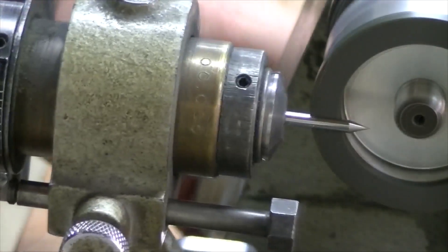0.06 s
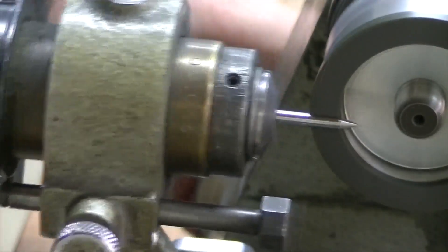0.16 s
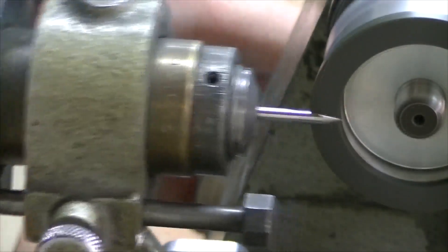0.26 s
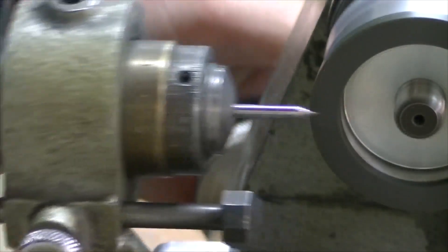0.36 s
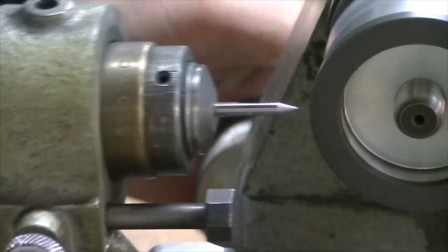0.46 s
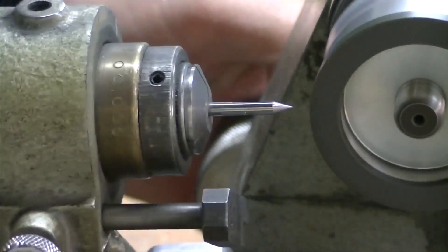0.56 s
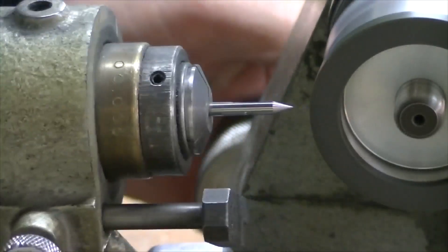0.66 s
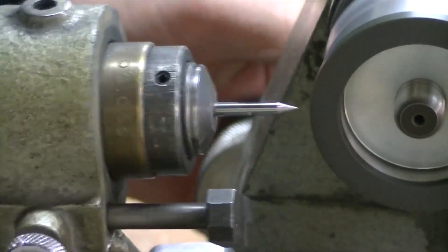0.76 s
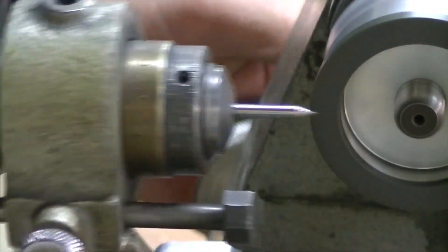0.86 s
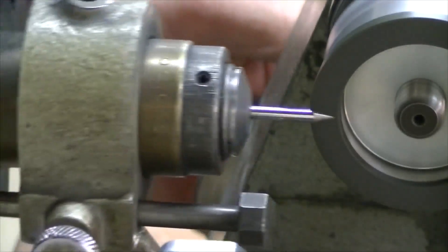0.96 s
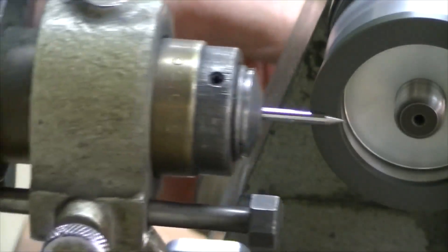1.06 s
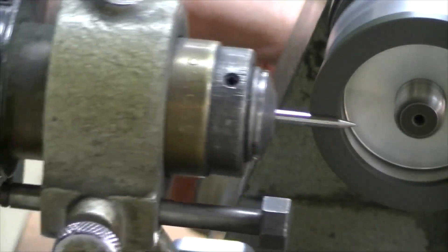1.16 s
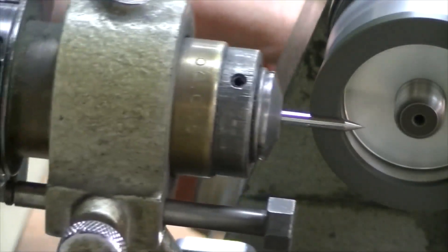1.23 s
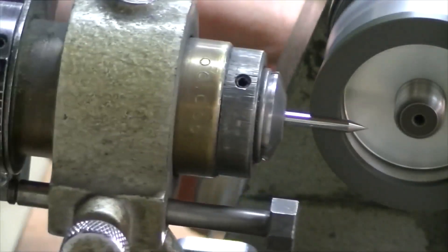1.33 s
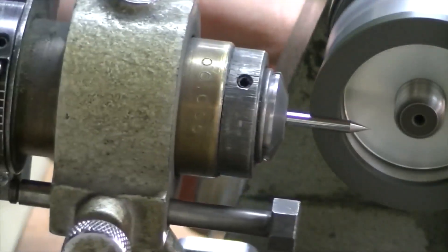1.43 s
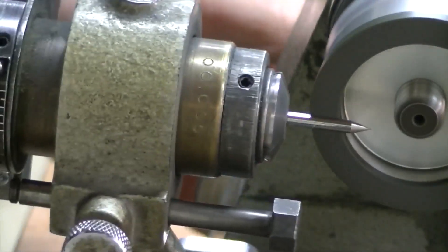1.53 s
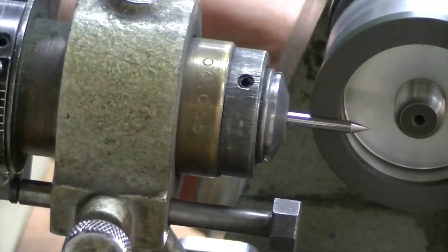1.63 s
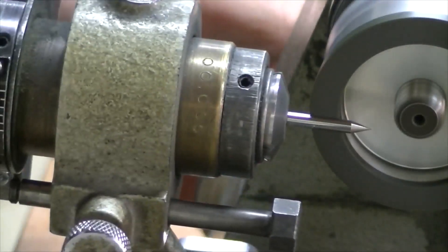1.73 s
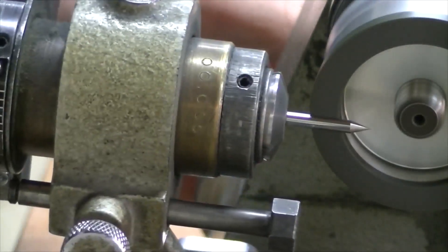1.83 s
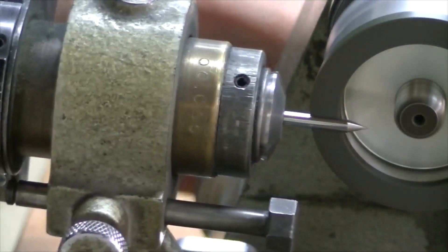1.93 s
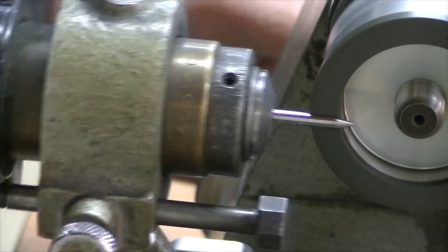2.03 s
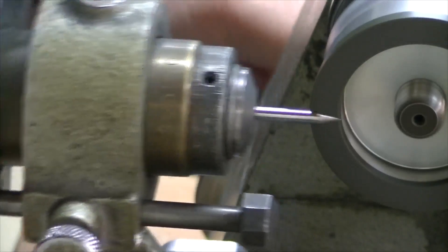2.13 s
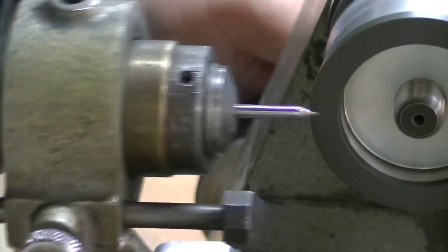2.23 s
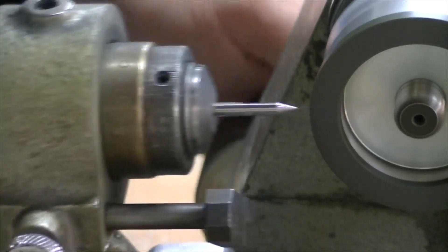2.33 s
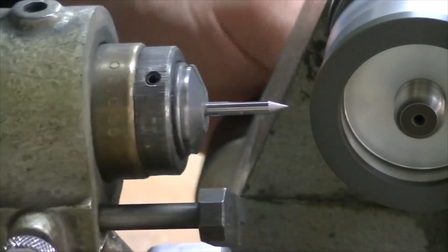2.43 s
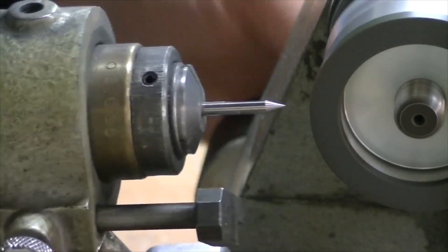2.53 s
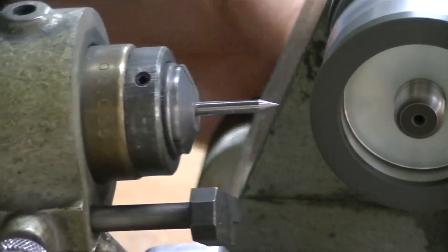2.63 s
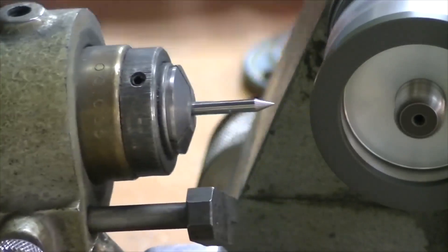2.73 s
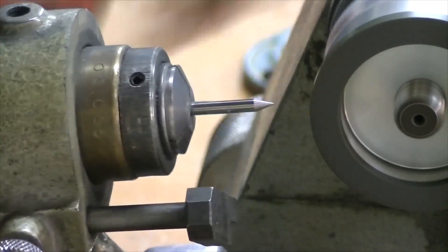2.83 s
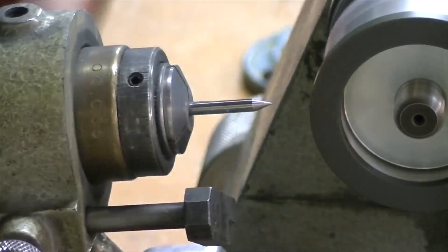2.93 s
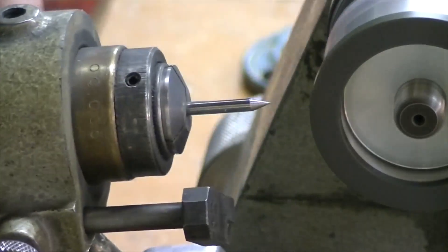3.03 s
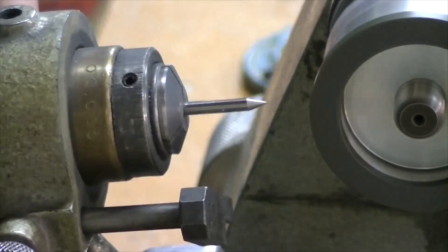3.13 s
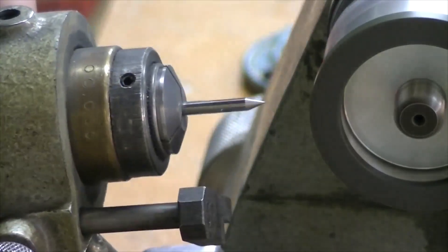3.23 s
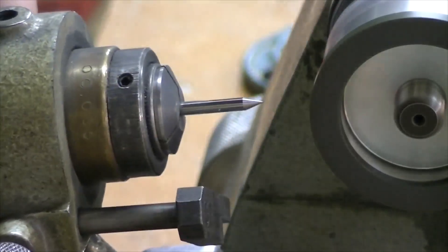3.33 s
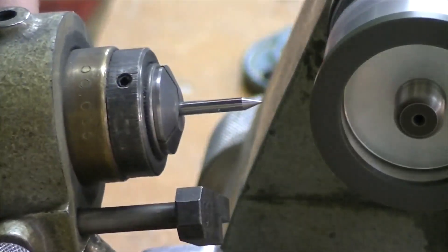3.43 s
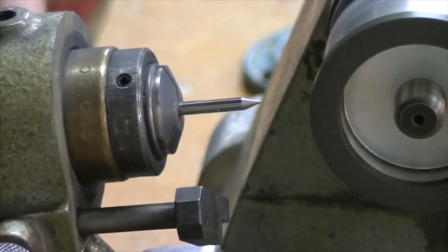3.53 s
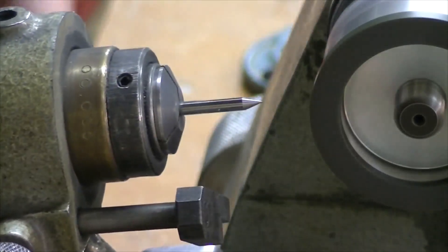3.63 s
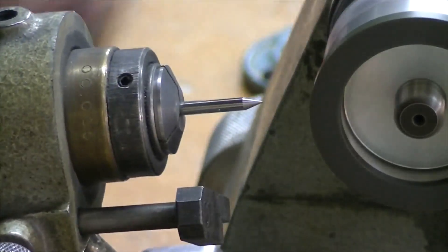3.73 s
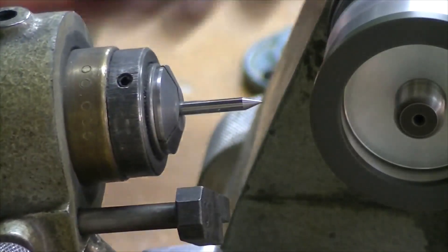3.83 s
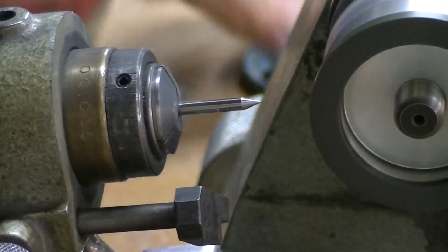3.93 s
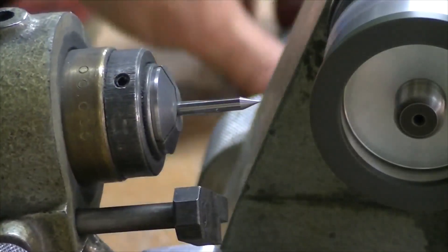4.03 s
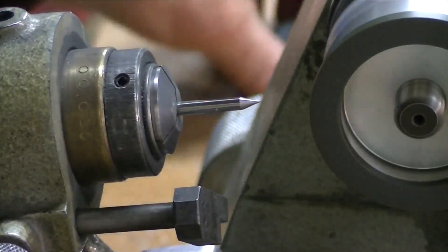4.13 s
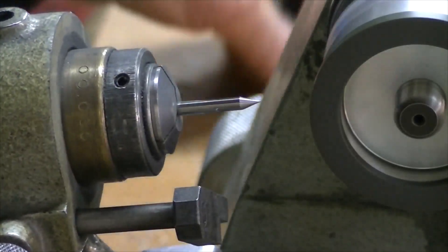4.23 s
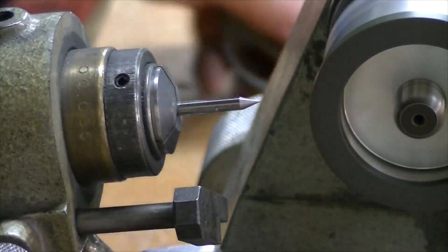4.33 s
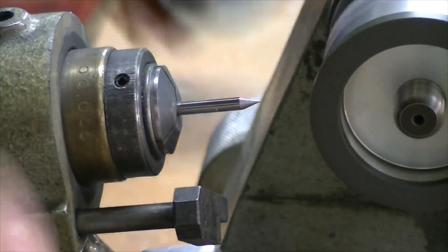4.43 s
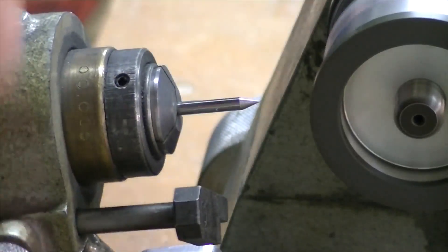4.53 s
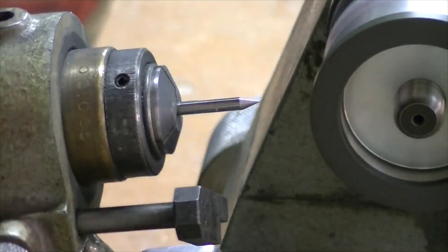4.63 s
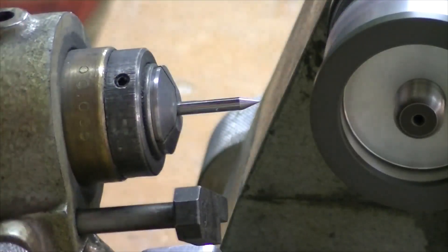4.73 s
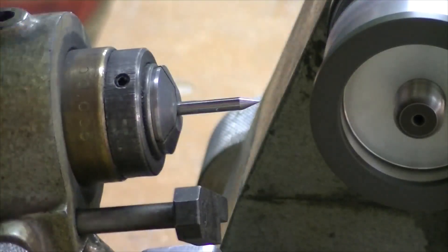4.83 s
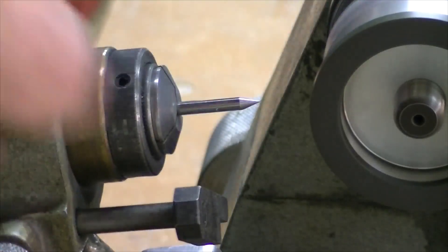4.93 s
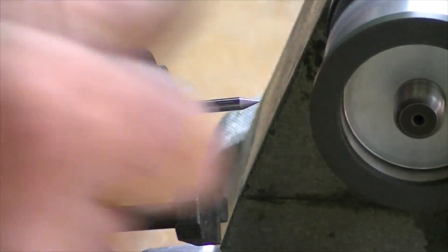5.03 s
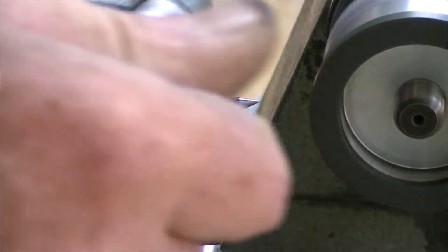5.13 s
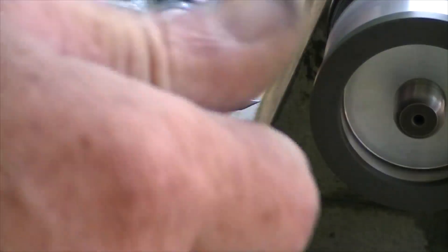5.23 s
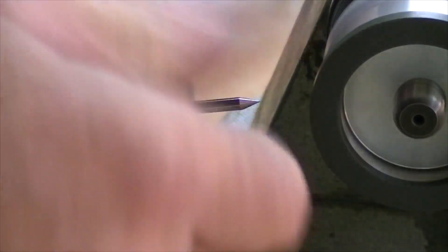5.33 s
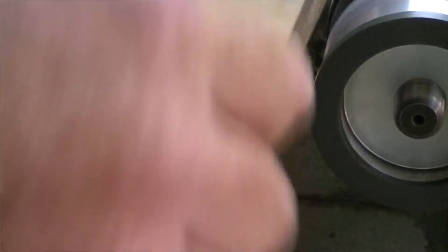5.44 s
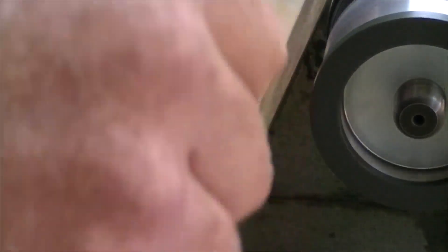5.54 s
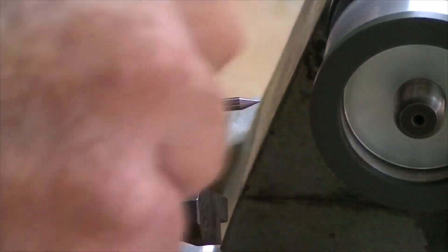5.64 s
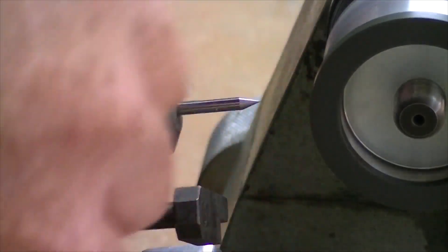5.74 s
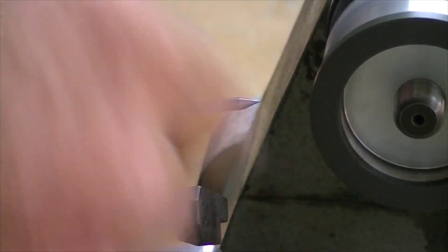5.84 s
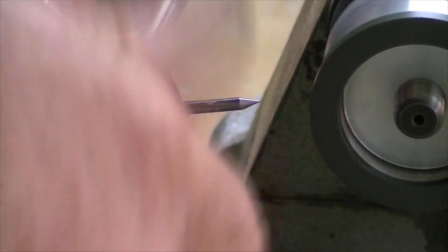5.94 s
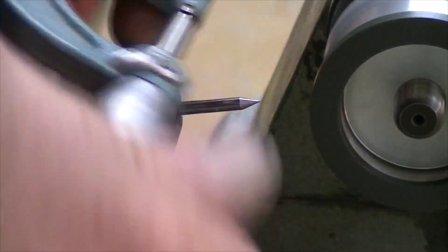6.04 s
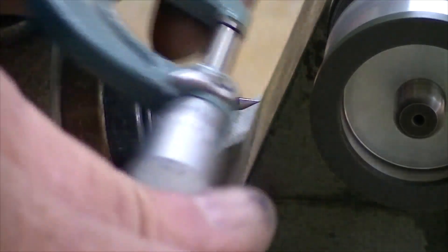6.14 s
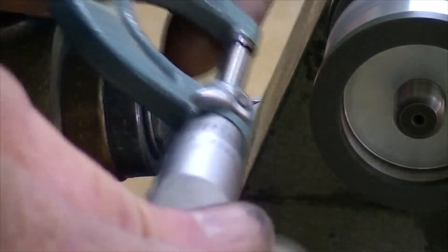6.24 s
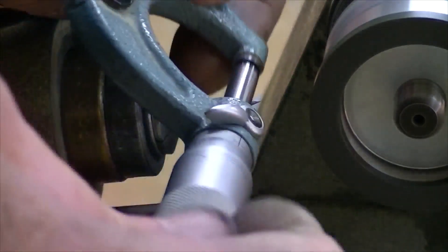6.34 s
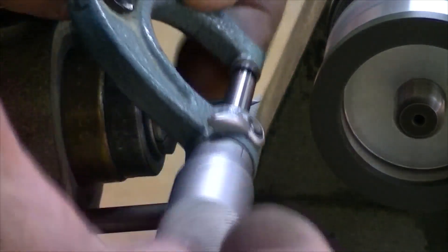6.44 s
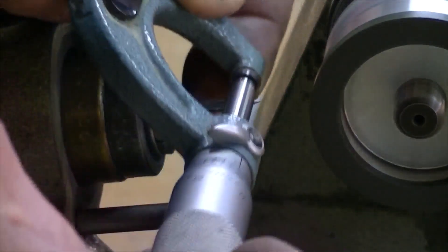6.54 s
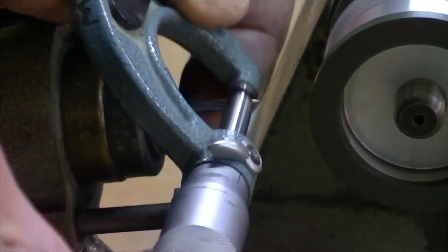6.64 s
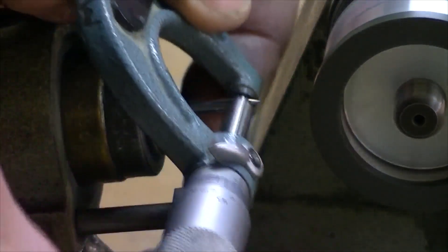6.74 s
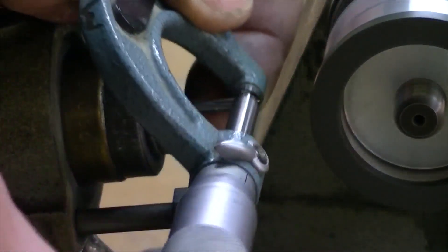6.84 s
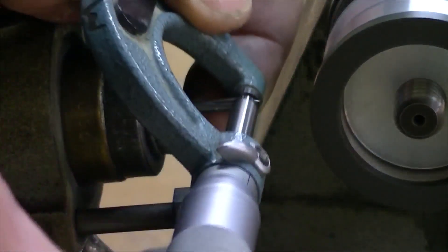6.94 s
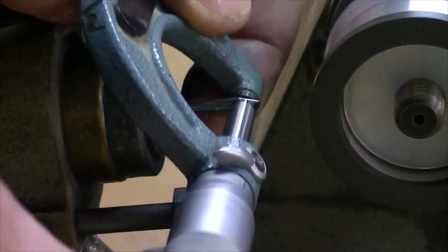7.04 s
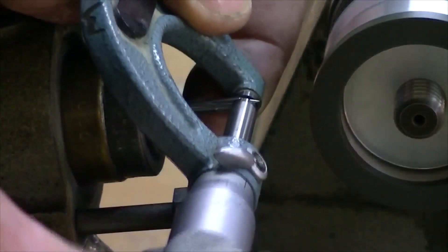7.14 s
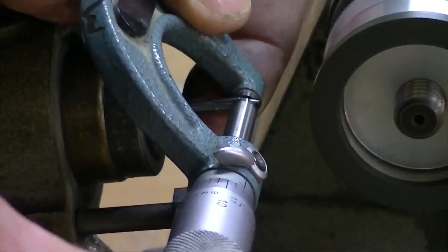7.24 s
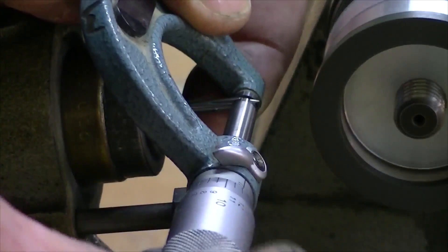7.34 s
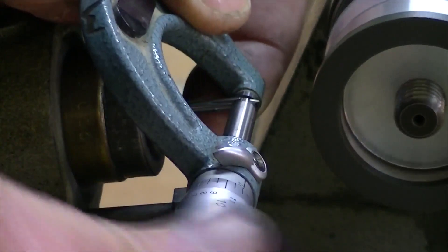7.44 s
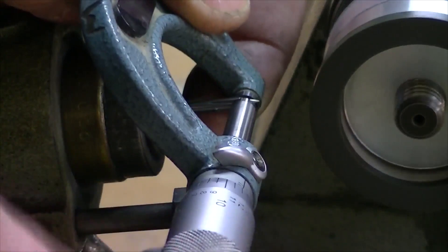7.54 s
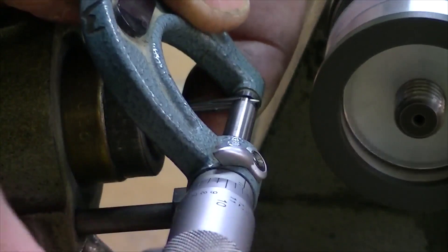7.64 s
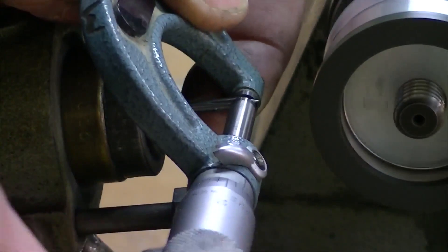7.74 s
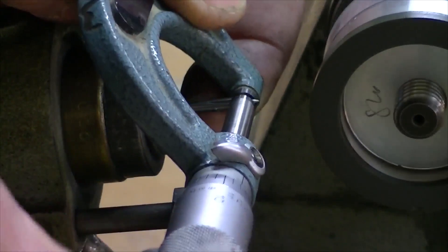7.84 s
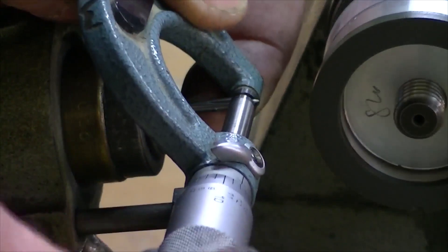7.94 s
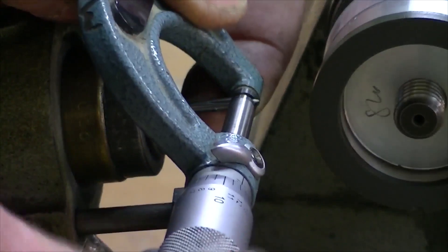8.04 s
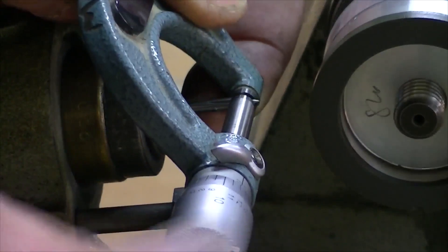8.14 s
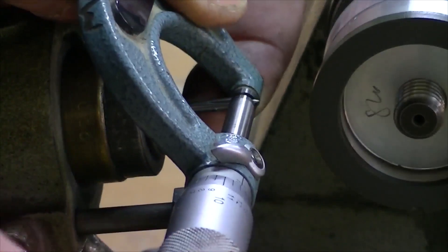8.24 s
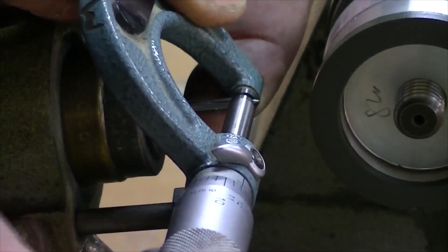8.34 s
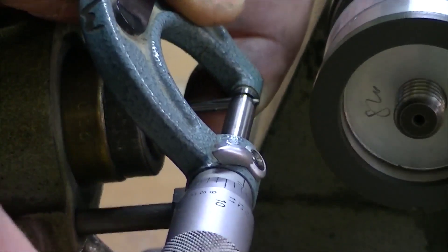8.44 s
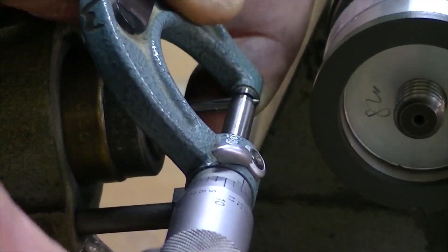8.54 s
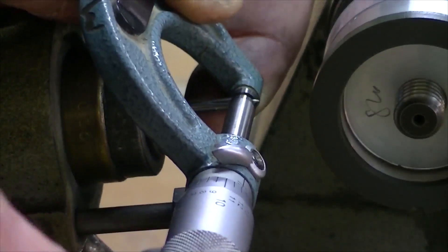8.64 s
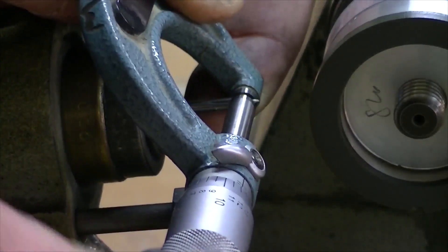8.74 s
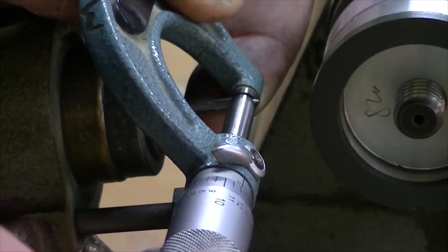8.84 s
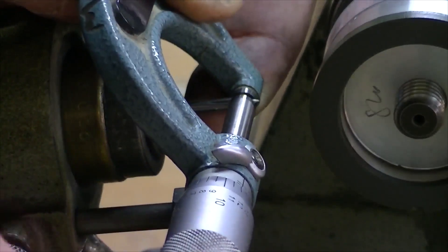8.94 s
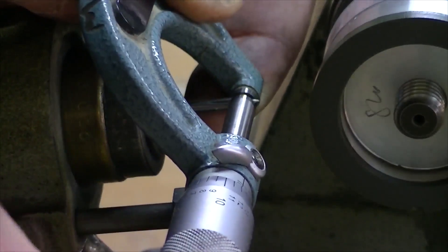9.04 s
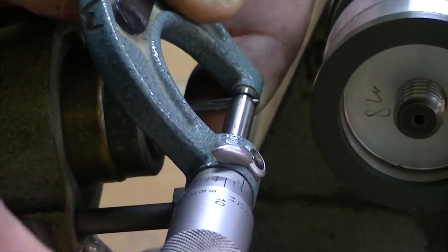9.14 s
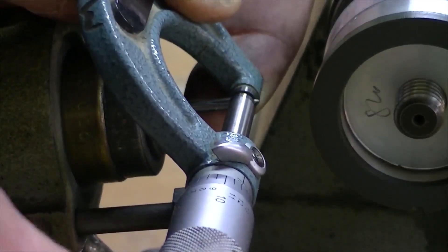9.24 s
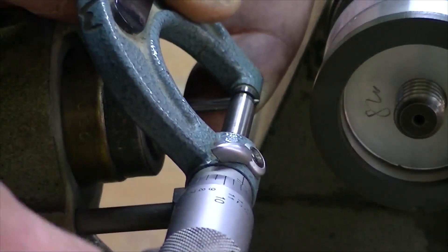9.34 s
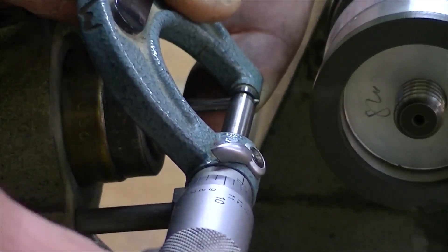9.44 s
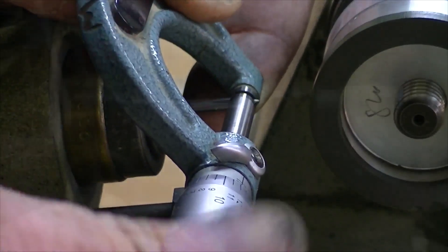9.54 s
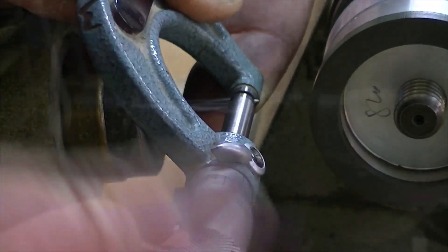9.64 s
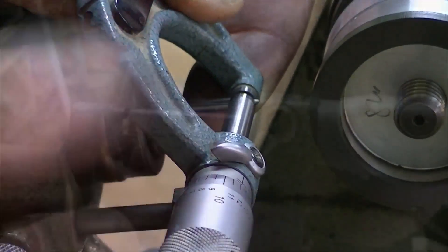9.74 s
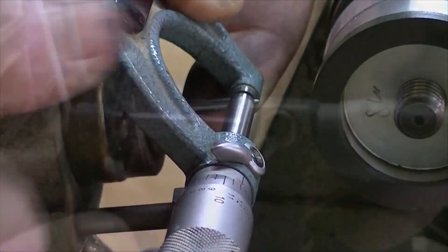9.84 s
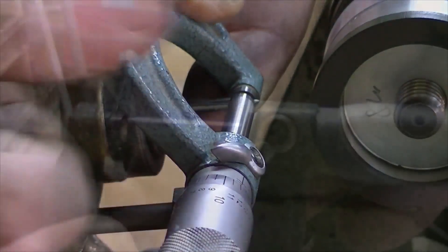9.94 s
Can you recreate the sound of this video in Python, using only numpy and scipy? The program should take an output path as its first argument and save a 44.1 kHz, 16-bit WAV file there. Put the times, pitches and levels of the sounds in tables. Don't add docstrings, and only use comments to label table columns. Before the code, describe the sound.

A small grinding spindle whines and hisses, swells twice, then coasts down to a rattling stop before three bursts of crisp ratchet clicks close by.

```python
import sys
import numpy as np
from scipy import signal
from scipy.fft import rfft, irfft, next_fast_len
from scipy.io import wavfile
from scipy.ndimage import uniform_filter1d

SR = 44100
rng = np.random.default_rng(int(sys.argv[2]) if len(sys.argv) > 2 else 0)


def makeup_ratio(level_db):
    decades = np.asarray(level_db, float) / 20
    return 10 ** decades


def transcribe(u):
    v = np.clip(np.atleast_2d(u).T, -1, 1)
    q = np.round(v * 32767).astype(np.int16)
    wavfile.write(sys.argv[1], SR, q)


N = 440118
TIME = np.arange(N) / SR

# t/s, f/Hz
SHAFT_SPEED = [(0.0, 225), (0.15, 213.1), (0.44, 231.7), (0.7, 259.2), (0.94, 276.5), (1.13, 285.0),
               (1.56, 275.0), (1.74, 243.5), (1.95, 220.6), (2.32, 241.6), (2.59, 267.4), (2.65, 269.4),
               (3.03, 243.8), (4.44, 164.3), (5.13, 131.0), (5.7, 103.0), (6.8, 56.0), (7.9, 9.0)]
# t/s, pressure/0-1
ROD_PRESSURE = [
    (0, 0.9),
    (.25, 0),
    (1.05, 0.5),
    (1.18, 0.84),
    (1.85, 1),
    (2.15, 0.3),
    (2.6, 1),
    (3.0, 0.7),
]
# f/Hz, level/dB
HOUSING_FAST = [(24, -73.5), (40, -63.5), (251, -19), (395, -17), (705, -9), (1050, -7.5), (1320, 5),
                (1700, -4), (2960, -3.5), (7330, -9.5), (9190, -3), (15200, -21.5), (16400, -20.5)]
# f/Hz, level/dB
HOUSING_SLOW = [(24, -58.5), (40, -60), (591, -12), (705, -18), (1050, -17.5), (1200, -12), (1930, -15),
                (2360, -5.5), (2550, -5.5), (7330, -9.5), (9190, -6.5), (13800, -18), (16400, -31.5)]
# f/Hz, width/Hz, level/dB
FAST_RINGS = [(700, 59, -10.5), (955, 37, -9), (1286, 87, -3.5), (2417, 45, -8), (2946, 270, -5),
              (3350, 380, -6.5), (3950, 120, -7.5), (4180, 90, -7.5), (5260, 210, -19.5), (6210, 69, -9),
              (6880, 66, -11.5), (9160, 110, -5.5)]
# f/Hz, width/Hz, level/dB
SLOW_RINGS = [(449.4, 28, -5.5), (715, 29, -4.5), (965, 40, -10), (1200, 37, 4), (1636, 150, -11.5),
              (2312, 180, -1.5), (2960, 150, 5), (3320, 39, 3.5), (3640, 250, 1.5), (4060, 90, -2),
              (5300, 180, -14), (5900, 85, -13), (6300, 90, -4.5), (8600, 130, -32.5),
              (1144, 19, -1), (1262, 38, -2), (1357, 64, -3), (2369, 45, 4.5), (2813, 240, -1),
                   (3414, 72, -1.5), (4260, 71, -2.5), (4380, 83, -5)]
# f/Hz, width/Hz, level/dB
SEAL_RINGS = [(9250, 220, -6.0), (14600, 1800, -25)]
# f/Hz, width/Hz, level/dB
CRAWL_RINGS = [(1600, 60, -7.5), (2300, 200, -22.5), (3000, 220, -2.5), (3500, 75, 1), (4250, 300, -19),
               (5400, 170, -12), (6430, 90, -19.5)]
# f/Hz, width/Hz, level/dB
BENCH_RINGS = [(379, 24, 4), (457, 22, 2.5), (591, 93, -4), (282, 87, -16.5)]
# level at 200 Hz/dB, slope/dB per decade of speed,
# knee under which it dies/Hz, steepness/1, wander/dB
ROAR = (-15.5, -4, 64, 5.5, 0.39)
HISS = (-27.5, 9.5, 45, 3.5, 0.57)
DRONE = (-26.5, -0.5, 38, 5, 0.5)
RUMBLE = (-34.5, -0.5, 24.5, 5, 1.5)
SHAKE_TURNS = [
    .395,
    .65,
    1,
    1.65,
    2,
    2.28,
]
SHAKE_DB = [-41, -44.5, -26.5, -43, -34, -31.5]
# f/Hz, level/dB
BENCH_ANSWER = [(50, -16), (85, -3.5), (105, -4.5), (120, -10), (143, -0.5), (175, -12.5), (215, -6.5),
                (283, -1), (330, -13), (380, 7.5), (430, -10.5), (470, 7.5), (510, -4), (560, 1.5),
                (620, -10.5), (700, 18.5), (800, -2.5)]
# multiple of shaft speed/1, loudest at speed f/Hz, span/Hz, level/dB
LATE_TONES = [(4.71, 84, 14, -42), (2.0, 125, 28, -46)]
# multiple of shaft speed/1, width/Hz, level/dB
SLIP_NOISE = [(4.7, 29, -27), (15.9, 400, -27), (11.6, 440, -28)]
# multiple of shaft speed/1, then level/dB at
BEARING_TONES = [(3.0, -22.0, -27.0, -21.0, -28.0, -45.0), (4.0, -28.0, -45.0, -26.0, -19.0, -22.0),
                 (4.55, -30.0, -20.0, -29.0, -32.0, -42.0), (4.71, -26.0, -18.0, -21.0, -16.0, -33.0),
                 (6.0, -32.0, -45.0, -24.0, -45.0, -45.0), (6.5, -43.0, -28.0, -45.0, -17.0, -25.0),
                 (7.0, -21.0, -28.0, -23.0, -16.0, -21.0), (8.0, -28.0, -28.0, -26.0, -17.0, -37.0),
                 (8.75, -45.0, -28.0, -34.0, -45.0, -18.0), (8.92, -40.0, -32.0, -42.0, -32.0, -13.0),
                 (9.25, -24.0, -17.0, -32.0, -26.0, -45.0), (9.69, -35.0, -19.0, -31.0, -18.0, -45.0),
                 (10.04, -36.0, -18.0, -28.0, -45.0, -26.0), (10.52, -44.0, -24.0, -44.0, -45.0, -43.0),
                 (10.88, -35.0, -28.0, -41.0, -24.0, -36.0), (11.2, -27.0, -20.0, -22.0, -24.0, -33.0),
                 (11.54, -45.0, -19.0, -37.0, -34.0, -25.0), (12.0, -29.0, -19.0, -25.0, -22.0, -26.0),
                 (12.55, -37.0, -45.0, -28.0, -45.0, -23.0),
                 (13.0, -30.0, -28.0, -44.0, -29.0, -45.0), (13.43, -31.0, -25.0, -30.0, -21.0, -17.0),
              (13.8, -42.0, -21.0, -41.0, -33.0, -14.0), (14.22, -40.0, -25.0, -42.0, -40.0, -12.0),
              (15.0, -23.0, -44.0, -44.0, -30.0, -22.0), (15.25, -18.0, -42.0, -41.0, -23.0, -31.0),
              (15.71, -21.0, -33.0, -25.0, -12.0, -31.0), (16.05, -18.0, -19.0, -24.0, -22.0, -42.0),
              (16.48, -27.0, -39.0, -30.0, -21.0, -36.0), (17.5, -36.0, -45.0, -42.0, -45.0, -24.0),
              (17.96, -25.0, -27.0, -42.0, -25.0, -24.0), (18.31, -26.0, -32.0, -44.0, -20.0, -45.0),
              (18.75, -39.0, -45.0, -45.0, -31.0, -40.0), (19.75, -45.0, -45.0, -44.0, -45.0, -22.0),
              (20.21, -33.0, -37.0, -45.0, -26.0, -21.0), (20.58, -30.0, -43.0, -44.0, -34.0, -24.0),
              (21.0, -45.0, -45.0, -45.0, -41.0, -24.0), (22.03, -44.0, -45.0, -45.0, -44.0, -39.0),
              (22.5, -37.0, -45.0, -33.0, -32.0, -18.0), (22.84, -43.0, -41.0, -44.0, -44.0, -28.0),
              (24.34, -40.0, -45.0, -45.0, -37.0, -43.0), (24.75, -36.0, -35.0, -45.0, -40.0, -32.0),
              (25.14, -45.0, -40.0, -42.0, -33.0, -40.0), (25.53, -45.0, -45.0, -45.0, -45.0, -40.0),
              (27.04, -41.0, -45.0, -44.0, -34.0, -28.0), (27.39, -45.0, -39.0, -45.0, -33.0, -34.0),
              (29.33, -45.0, -33.0, -45.0, -42.0, -42.0), (29.65, -45.0, -45.0, -42.0, -36.0, -31.0)]
STAGE_TIMES = [.5, .9, 1.7, 2.05, 2.55, 2.8, 3.3, 3.7]
STAGE_NUMBERS = [0, 1, 1, 2, 2, 3, 3, 4]
# f/Hz, width/Hz, level/dB
TONE_RINGS = [(710, 60, -8), (960, 60, -10), (1200, 60, -5), (1320, 60, -3), (2030, 82, -8),
              (2400, 90, -12), (2960, 118, -3), (3250, 130, -9), (3480, 110, -4),
              (3620, 130, -5), (3900, 160, -8), (4120, 100, -5), (4400, 160, -13), (4650, 160, -8),
             (5280, 160, -3), (5990, 160, -7), (6300, 160, 0), (6980, 160, -6)]
# multiple of shaft speed/1, t/s, length/s, level/dB
FLARES = [(4.71, 1.02, 0.15, -19), (4.71, 1.32, 0.13, -19), (4.71, 2.4, 0.13, -21), (4.71, 2.6, 0.1, -22),
          (4.71, 2.89, 0.14, -20), (6.5, 4.07, 0.17, -23), (9.25, 0.72, 0.19, -25), (11.2, 0.83, 0.26, -21),
          (11.2, 2.58, 0.17, -24), (11.54, 1.14, 0.22, -23), (12, 1.17, 0.26, -24), (12, 2.36, 0.15, -25),
          (13, 0.82, 0.13, -23), (13, 2.67, 0.16, -25), (13.43, 0.77, 0.24, -24), (13.43, 3.45, 0.26, -22),
          (13.8, 1.01, 0.13, -25), (13.8, 4.36, 0.19, -26), (14.22, 3.74, 0.3, -23), (15, 3.87, 0.18, -25),
          (15.25, 0.39, 0.14, -24), (15.71, 0.38, 0.18, -25), (15.71, 2.46, 0.13, -26),
          (15.71, 2.83, 0.2, -27), (15.71, 3.29, 0.16, -19), (16.05, 0.88, 0.13, -25),
          (16.05, 2.49, 0.12, -21), (16.05, 2.79, 0.11, -25), (16.48, 0.46, 0.13, -23),
          (16.48, 3.27, 0.2, -25), (20.21, 3.86, 0.17, -25), (20.21, 4.19, 0.16, -25),
          (22.84, 4.37, 0.21, -28)]
# t/s, length/s, ring f/Hz, level/dB
SURGES = [(4.07, 0.068, 1200, -28), (4.465, 0.041, 2370, -24.5), (4.86, .07, 2413, -26.5),
          (5.138, 0.06, 1200, -20.5), (5.23, 0.027, 2345, -25), (5.656, 0.092, 1205, -27),
          (5.772, 0.031, 2395, -24), (6.114, 0.014, 2430, -20), (6.204, 0.027, 1202, -21),
          (6.338, 0.015, 1200, -18), (6.54, 0.13, 1200, -24.5), (6.799, 0.019, 2430, -24.5),
          (6.912, 0.014, 1172, -21.5), (7.157, 0.037, 1157, -29.5), (7.572, 0.1, 385.5, -39),
          (7.674, 0.016, 700, -47), (7.714, 0.019, 715, -34), (1.75, 0.2, 1238, -26), (6.57, .06, 125, -47),
          (1.68, 0.1, 190, -44),
          (3.544, 0.033, 2885, -23), (4.046, 0.023, 1283, -25.5), (4.502, 0.052, 3250, -27.5),
               (4.589, 0.028, 2940, -25.5), (4.786, 0.05, 3720, -25.5), (4.807, 0.034, 1330, -28),
               (5.039, 0.025, 3760, -23.5), (5.268, 0.025, 3350, -18.5), (5.335, 0.022, 3020, -23.5),
               (5.866, 0.023, 3660, -26), (5.973, 0.038, 3220, -23), (6.101, 0.056, 1335, -30)]
# start t/s, length/s, level/dB
ROD_SINGS = [
    (-0.1, 0.2, -20.5),
    (0.11, 0.3, -23),
    (1.85, 0.3, -31),
]
# t/s, peak level/dB
KNOCKS = [(6.9547, -20.5), (7.047, -21.5), (7.206, -34), (7.29, -13), (7.3384, -18.5), (7.3748, -30.5),
          (7.416, -21), (7.4351, -27.5), (7.4775, -28), (7.506, -31), (7.5593, -28.5), (7.6481, -31),
          (7.304, -30), (7.57, -35), (7.7294, -42), (7.7738, -42)]
# f/Hz, width/Hz, level/dB
KNOCK_RINGS = [(5300, 370, -3.5), (6500, 500, -11), (8400, 600, -4.5), (9250, 500, -0.5), (11100, 1200, -8)]
# f/Hz, level/dB
MIC_RIPPLE = [(9300, 0), (9700, -3.5), (10600, 0), (12150, 1), (12500, -5), (13200, -1.5), (14900, 0.5),
              (15450, -4)]
# f/Hz, level/dB
SIDE_COLOUR = [(60, -19), (130, -26), (290, -21.5), (640, -23), (1410, -22.5), (3100, -20), (6820, -14),
               (15000, -24)]
# t/s, peak level/dB, brightest f/Hz, frame ring level/dB, body thud level/dB
CLICKS = [(7.81, -17, 8240, -42, -18), (7.862, -17, 8310, -53, -25), (7.9368, -16, 9070, -49, -23),
          (7.9588, -19, 7860, -27, -21), (7.978, -17, 9660, -32, -24), (7.9988, -18, 8680, -26, -20),
          (8.0447, -15.5, 7830, -32, -35), (8.506, -16.5, 7430, -38, -32), (8.5457, -16, 8730, -41.5, -24),
          (8.5874, -15.5, 8600, -40, -22.5), (8.635, -16.5, 7100, -40, -11),
          (8.7021, -14.5, 9820, -41, -23), (9.155, -17.5, 7040, -38, -33), (9.186, -19.5, 8150, -43, -22),
          (9.21, -17, 7140, -39, -25), (9.25, -17.5, 7970, -33.5, -26), (9.3193, -17.5, 9930, -43, -18.5),
          (9.408, -15.5, 8170, -37, -19.5)]
THUD_HZ = [4300, 3300, 4500, 4400, 4300, 4200, 3360, 5200, 4120, 4440, 5180, 4200, 5200, 3010, 5200, 5200,
           5200, 5520]
# frame level/dB, tip level/dB
CLICK_TINTS = [(-21, -5), (-13, -1), (-20.5, -4), (-15, -2), (-19, -1), (-12, -1.5), (-12, -9), (-22, -5.5),
               (-23.5, -12.5), (-13.5, -8), (-11.5, 4.5), (-20, -2.5), (-12, -2), (-17, -6.5), (-23, -5),
               (-12, -11), (-15.5, 2), (-11.5, -2.5)]
# f/Hz, width/Hz, level/dB
PAWL_RINGS = [(5630, 1100, -3), (7100, 1300, -4), (8380, 1100, 0), (12700, 2300, -12.5)]
# t/s, peak level/dB
FOCUS_STEPS = [(8.1349, -52), (8.2016, -53), (8.2681, -52), (8.3015, -52), (8.4352, -52), (8.555, -44),
               (9.219, -39), (8.769, -50), (8.8353, -51)]
# f/Hz, fade/s
ROOM_FADE = [(500, 0.51), (2000, 0.22), (6000, 0.26), (12000, 0.071)]
# f/Hz, level/dB per Hz
AIR_COLOUR = [(12, -58), (20, -42.5), (69, -13), (147, -7), (237, -13), (519, -18.5), (668, -19.5),
              (910, -21), (9620, -34.5), (15100, -46.5), (16400, -60)]


def spindle():
    speed = curve(SHAFT_SPEED, 1)
    angle = 2 * np.pi * np.cumsum(speed) / SR
    slow = np.clip((235 - speed) / 90, 0, 1)
    out = whine(angle, speed, slow) + flares(angle)
    out += housing_noise(angle, speed, slow) + low_shaking(angle, speed)
    return out * np.clip((7.95 - TIME) / 0.2, 0, 1) ** 0.59


def whine(angle, speed, slow):
    end, step = 47 * SR // 10, slice(0, N, 200)
    out = np.zeros(N)
    waver = np.array([drift(24) for _ in range(5)] + [drift(4.6) for _ in range(7)])
    time, rate, ease = TIME[step], speed[step], slow[step]
    change = np.gradient(rate, time)
    load = np.clip(-change / 110, 0, 1) ** 4
    pull = np.clip(change / 90, 0, 1)
    slack = np.clip(2.5 - abs(time - 1.62) / .16, 0, 1)
    alive = np.clip((rate - 153) / 25, 0, 1)
    stage_now = np.interp(time, STAGE_TIMES, STAGE_NUMBERS)
    stage = np.clip(1 - abs(stage_now - np.arange(5)[:, None]), 0, 1)
    for k, (turns, *dbs) in enumerate(BEARING_TONES):
        ceiling_db = -25.5 if 9 < turns < 17 else -21
        mean = np.sqrt(makeup_ratio(np.minimum(dbs, ceiling_db)) ** 2 @ stage)
        mean = mean * rings(TONE_RINGS, turns * rate)
        waver_db = (2.2 + 1.5 * ease) * waver[k % 5, step] + 1.1 * waver[5 + k % 7, step]
        silence_db = 9 * slack * (turns * rate > 3550)
        gain = mean ** 0.82 * makeup_ratio(-3 - 8 * load + 2.5 * pull + waver_db - silence_db) * alive
        phase = turns * angle + (0.25 + 0.55 * slow) * waver[(k + 2) % 5] + k
        out[:end] += np.interp(TIME[:end], time, gain) * np.cos(phase[:end])
    return out


def flares(angle):
    out, wobble = np.zeros(N), 0.7 * drift(30)
    for turns, s, length, db in FLARES:
        part = slice(max(round((s - length) * SR), 0), round((s + length) * SR))
        swell = np.exp(-3.2 * ((TIME[part] - s) / length) ** 2)
        level = makeup_ratio(db - 1 + 3 * wobble[::-1][part])
        out[part] += level * swell * np.cos(turns * angle[part] + wobble[part])
    return out


def housing_noise(angle, speed, slow):
    noise = rolling_noise(angle, slow)
    fast = colour(noise + slip(angle), lambda hz: np.hypot(
        makeup_ratio(read(HOUSING_FAST, hz) - 7), rings(FAST_RINGS, hz) * makeup_ratio(2)))
    coast_rings = SLOW_RINGS + SEAL_RINGS
    coast = colour(noise, lambda hz: np.hypot(
        makeup_ratio(read(HOUSING_SLOW, hz) - 6), rings(coast_rings, hz) * makeup_ratio(-3.5)))
    body = (1 - slow) * evened(fast) + slow * evened(coast)
    ending = np.clip((50 - speed) / 20, 0, 1)
    body += ending * makeup_ratio(-12.5) * evened(colour(noise, lambda hz: rings(CRAWL_RINGS, hz)))

    dull = np.clip((102 - speed) / 72, 0, 1.3)
    press = curve(ROD_PRESSURE, 1)
    roar = band(body, 958, 1960) * makeup_ratio(6.5 * dull + 2.5 * press)
    cup = band(body, 3470, 5730) * makeup_ratio(-3.5 - 4 * press)
    roar += (band(body, 2200, 3573) - cup) * makeup_ratio(-2.5 * dull)

    last = np.clip((48 - speed) / 30, 0, 1)
    last_ring = evened(colour(noise, lambda hz: rings([(710, 34, 0)], hz)))
    drone = (1 - last) * evened(band(body, 531, 884)) + last * last_ring

    crawl = np.clip((135 - speed) / 30, 0, 1)
    stirred = evened(colour(noise, lambda hz: rings(BENCH_RINGS, hz) * hz / (hz + 300)))
    rumble = (1 - crawl) * evened(band(fast, 62, 550)) + crawl * stirred

    out = strength(speed, *ROAR) * evened(roar)
    out += strength(speed, *HISS) * evened(band(body, 4580, 20000))
    out += strength(speed, *DRONE) * drone + strength(speed, *RUMBLE) * rumble
    shudder = np.exp(-((speed - 105) / 35) ** 2)
    return out + makeup_ratio(-50) * shudder * evened(band(noise, 60, 170))


def rolling_noise(angle, slow):
    taps = rng.random(N) < 900 / SR
    tap_db = 4.8 * np.minimum(rng.exponential(1, N), 3)
    rattle = taps * makeup_ratio(tap_db) * rng.choice([-1, 1], N)
    cage = 1 + 0.12 * np.cos(SHAKE_TURNS[0] * angle)
    hiss = rng.standard_normal(N) * cage * makeup_ratio((0.5 + 0.1 * slow) * drift(40))
    return hiss + 0.44 * slow * evened(rattle)


def slip(angle):
    out = np.zeros(N)
    for turns, width, db in SLIP_NOISE:
        low_pass = signal.butter(2, width / 2, fs=SR, output="sos")
        a, b = signal.sosfilt(low_pass, rng.standard_normal((2, N)))
        out += makeup_ratio(db) * evened(a * np.cos(turns * angle) + b * np.sin(turns * angle))
    return out


def strength(speed, db, slope_db, knee_hz, steep, wander_db):
    level = makeup_ratio(db + slope_db * np.log10(speed / 200) + wander_db * drift(6))
    return level / np.sqrt(1 + (knee_hz / speed) ** steep)


def low_shaking(angle, speed):
    out = np.zeros(N)
    for turns, at_hz, span_hz, db in LATE_TONES:
        out += np.exp(-((speed - at_hz) / span_hz) ** 2) * shaft_tone(angle, turns, db, 2.6)
    for turns, db in zip(SHAKE_TURNS, SHAKE_DB):
        force = (speed / 260) ** 2.14
        out += force * makeup_ratio(read(BENCH_ANSWER, turns * speed)) * shaft_tone(angle, turns, db, 1.7)
    return out


def shaft_tone(angle, turns, db, waver_db):
    return makeup_ratio(db + waver_db * drift(9)) * np.cos(turns * angle + 0.8 * drift(8.9))


def surges():
    out, wobble = np.zeros(N), 0.7 * drift(45)
    for s, length, hz, db in SURGES:
        part = slice(round((s - .3) * SR), round((s + .3) * SR))
        swell = np.exp(-2 * ((TIME[part] - s) / length) ** 2)
        out[part] += makeup_ratio(db + 6) * swell * np.sin(2 * np.pi * hz * TIME[part] + wobble[part])
    return out


def rod():
    hz, width_hz = 3510, 72
    out = np.zeros(N)
    tone = evened(band(rng.standard_normal(N), hz - width_hz / 2, hz + width_hz / 2))
    for s, length, db in ROD_SINGS:
        swell = np.sin(np.pi * np.clip((TIME - s) / length, 0, 1)).clip(0)
        out += makeup_ratio(db) * np.sqrt(swell) * tone
    return out


def knocks():
    out = np.zeros(N)
    for s, db in KNOCKS:
        crack = burst(length=.02, rise=0.00042, t60=.012)
        tick = colour(crack, lambda hz: rings(KNOCK_RINGS, hz))
        add(out, s, makeup_ratio(db) * tick / abs(tick).max())
    return out


def ratchet():
    out, t = np.zeros(N), np.arange(6000) / SR
    for (s, db, hz, ring_db, thud_db), thud_hz, (frame_db, tip_db) in zip(CLICKS, THUD_HZ, CLICK_TINTS):
        chatter = rng.standard_normal(len(t)) * np.clip(t / 0.00034, 0, 1)
        chatter = chatter * makeup_ratio(-5 * t / 0.0036) / (1 + (t / 0.0024) ** 6)
        body = [(hz, 900, 1.5), (thud_hz, 1700, thud_db + 16), (2400, 1300, frame_db),
                (10300, 1500, tip_db), (1150, 300, ring_db - db)]
        snap = colour(whitened(chatter, size=150),
                      lambda f: rings(PAWL_RINGS + body, f) / (1 + (650 / (f + 1)) ** 4))
        ring = np.sin(2 * np.pi * 1593 * t)
        ring += .6 * np.sin(2 * np.pi * 1500 * t + 9 * hz) * makeup_ratio(-600 * t)
        ring += .7 * np.sin(2 * np.pi * 1240 * t) * makeup_ratio(-900 * t)
        ring *= makeup_ratio(ring_db - 5.5 - 60 * t / 0.12) * np.clip(t / 0.002, 0, 1)
        scatter = evened(band(rng.standard_normal(len(t)), 3700, 10300))
        scatter = scatter * makeup_ratio(db - 33.5 - 60 * t / 0.21) * np.clip(t / .004, 0, 1)
        add(out, s - .0004, makeup_ratio(db + 5) * snap / abs(snap).max() + ring + scatter)
    return out


def focus():
    pulse = np.maximum(np.cos(2 * np.pi * 30 * (TIME - 8.088)), 0) ** 1.5
    on = np.clip((TIME - 7.9) / .1, 0, 1) * np.clip((9 - TIME) / .2, 0, 1)
    hum = np.sin(2 * np.pi * 2870 * TIME + drift(40))
    out = makeup_ratio(-63 + 2.6 * drift(30)) * pulse * on * hum
    t = TIME[:900]
    step = np.sin(2 * np.pi * 3950 * t) * t * makeup_ratio(-5000 * t)
    for s, db in FOCUS_STEPS:
        add(out, s, makeup_ratio(db) * step / abs(step).max())
    return out


def room(x):
    hz, t, z = signal.stft(rng.standard_normal((2, SR // 2)), SR, nperseg=256)
    fade = makeup_ratio(-60 * t / read(ROOM_FADE, hz)[:, None])
    tail = signal.istft(z * fade, SR, nperseg=256)[1]
    tail[:, :120] = 0
    tail = tail[0] + 0.39 * tail[1] * np.array([[1], [-1]])
    return signal.fftconvolve(x[None], tail / np.linalg.norm(tail[0]), axes=1)[:, :N]


def floor():
    a, b = (evened(colour(rng.standard_normal(N), lambda hz: makeup_ratio(read(AIR_COLOUR, hz)))) for _ in range(2))
    air = makeup_ratio(-57) * np.array([a + .3 * b, a - .3 * b])
    deep = makeup_ratio(-68) * evened(band(rng.standard_normal((2, N)), 21, 42))
    hum = makeup_ratio(-70 + 2.5 * drift(19)) * np.sin(2 * np.pi * 665 * TIME + drift(3.8))
    return air + deep + hum


def port(x):
    size = next_fast_len(N)
    hz = np.fft.rfftfreq(size, 1 / SR)
    return irfft(rfft(x, size) * makeup_ratio(read(MIC_RIPPLE, hz)) * (hz < 15750), size)[:N]


def evened(x):
    return x / np.sqrt(np.mean(x ** 2) + 1e-20)


def read(points, hz):
    f, value = np.transpose(points)
    return np.interp(np.log(hz + 1), np.log(f + 1), value)


def curve(rows, column):
    rows = np.array(rows)
    line = np.interp(TIME, rows[:, 0], rows[:, column])
    return uniform_filter1d(line, size=3969, mode="nearest")


def drift(hz):
    count = int(N / SR * hz) + 3
    line = np.interp(TIME * hz, np.arange(count), rng.standard_normal(count))
    return evened(uniform_filter1d(line, int(SR / hz / 2)))


def colour(x, gain):
    log = np.log(gain(abs(np.fft.fftfreq(16384, 1 / SR))) + 1e-5)
    taps = np.fft.ifft(np.exp(np.conj(signal.hilbert(log)))).real
    if abs(taps[:6000]).sum() <= abs(taps[-6000:]).sum():
        taps = np.roll(taps[::-1], 1)
    return signal.oaconvolve(x, taps[:6000])[:len(x)]


def rings(modes, hz):
    power = sum(makeup_ratio(db) ** 2 / (1 + ((hz - f) / (w / 2)) ** 2) ** 1.39 for f, w, db in modes)
    return np.sqrt(power)


def band(x, lo_hz, hi_hz):
    return signal.sosfilt(signal.butter(3, [lo_hz, hi_hz], "band", fs=SR, output="sos"), x)


def burst(length, rise, t60):
    t = np.arange(int(length * SR)) / SR
    return rng.standard_normal(len(t)) * np.clip(t / rise, 0, 1) * makeup_ratio(-60 * t / t60)


def whitened(x, size):
    z = rfft(x)
    flat = irfft(z / np.sqrt(uniform_filter1d(abs(z) ** 2, size) + 1e-12), len(x))
    return flat * np.exp(-(np.arange(len(x)) / (.006 * SR)) ** 4)


def add(mix, s, sound):
    part = mix[round(s * SR):][:len(sound)]
    part += sound[:len(part)]


def scene():
    machine = port(spindle() + surges() + rod() + knocks())
    blur = evened(burst(length=0.14, rise=0.0048, t60=.2)) / np.sqrt(.15 * SR)
    smeared = signal.oaconvolve(machine, blur)[:N]
    side = colour(smeared, lambda hz: makeup_ratio(read(SIDE_COLOUR, hz) + 1.5)) - .03 * machine
    clicks = ratchet()
    mix = machine + side * np.array([[1], [-1]])
    mix = mix + clicks * makeup_ratio(np.array([[-0.3], [0.3]])) + makeup_ratio(-15.5) * room(clicks)
    return mix + focus() + floor()


def top_cut(x):
    return signal.sosfilt(signal.butter(12, 16550, fs=SR, output="sos"), x)


def record(dry):
    heard = signal.sosfilt(signal.butter(1, 30, "high", fs=SR, output="sos"), dry)
    heard = signal.oaconvolve(heard, signal.firwin(255, 16150, fs=SR)[None], "same")
    soft = 0.99 * np.tanh(heard / 0.94) * 0.6
    mix = soft + 0.43 * np.clip(heard, -.9, .9)
    return top_cut(mix)


dry = scene()
out = record(dry)
transcribe(out)
```